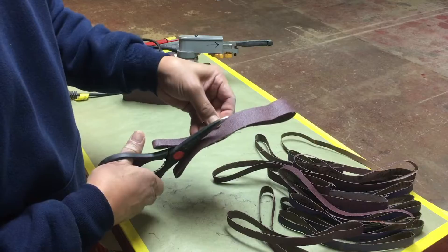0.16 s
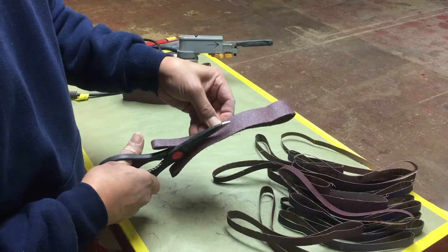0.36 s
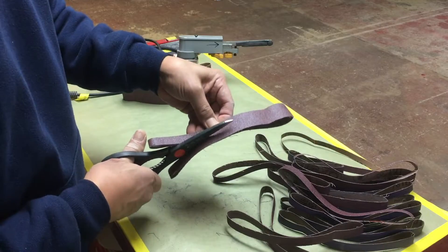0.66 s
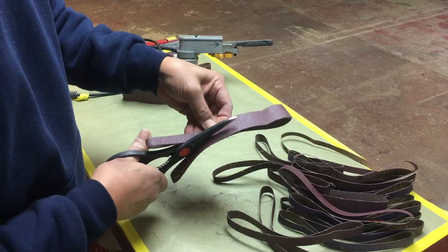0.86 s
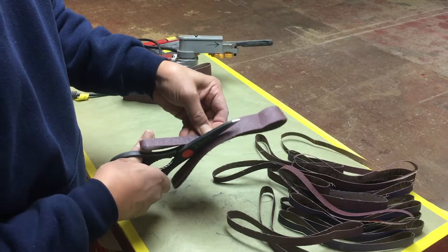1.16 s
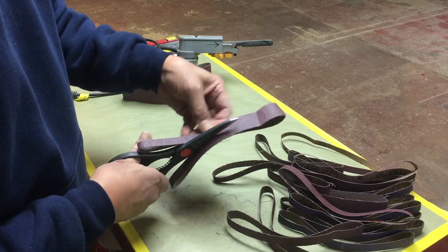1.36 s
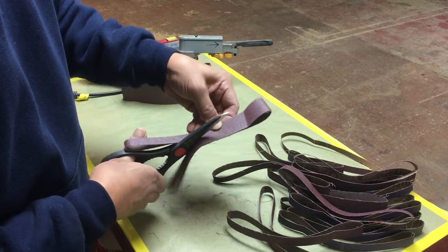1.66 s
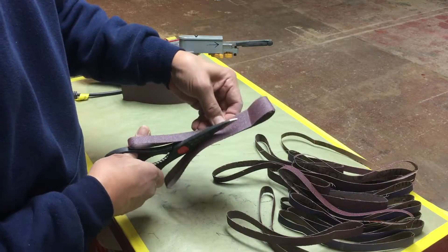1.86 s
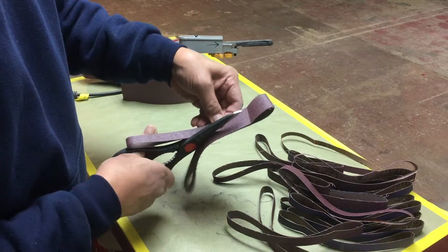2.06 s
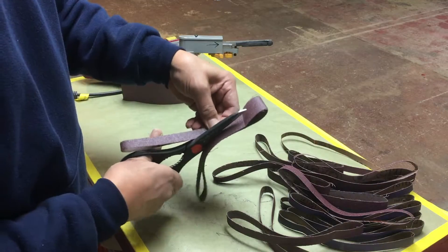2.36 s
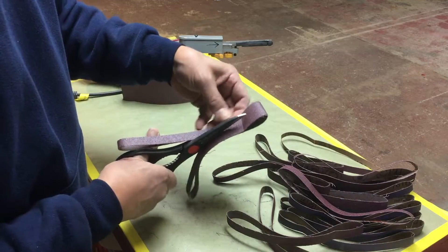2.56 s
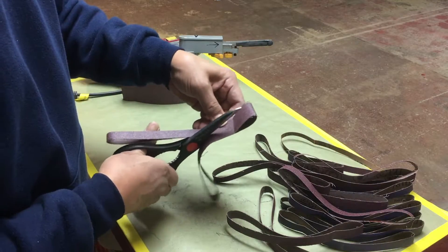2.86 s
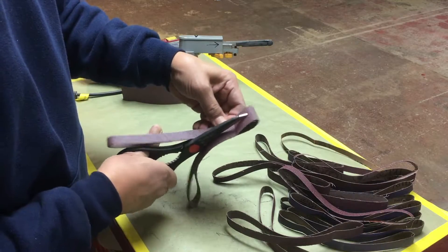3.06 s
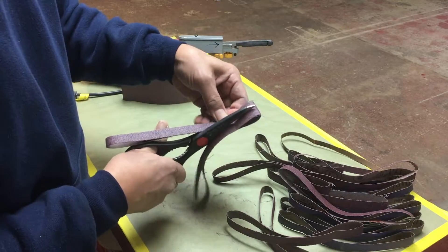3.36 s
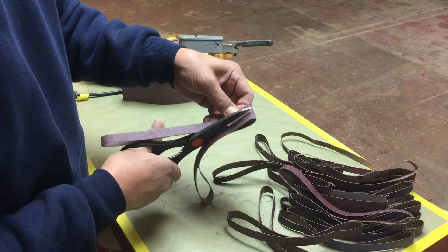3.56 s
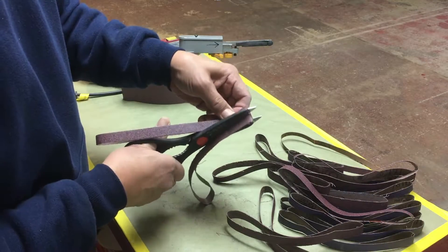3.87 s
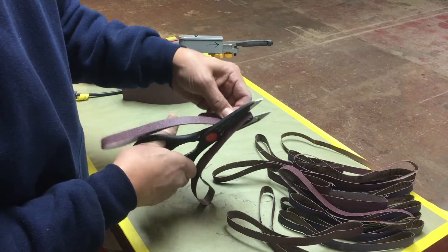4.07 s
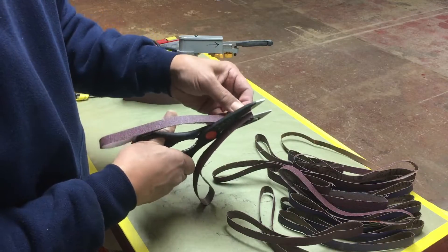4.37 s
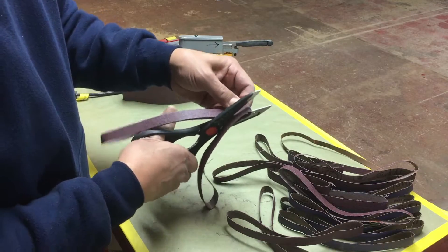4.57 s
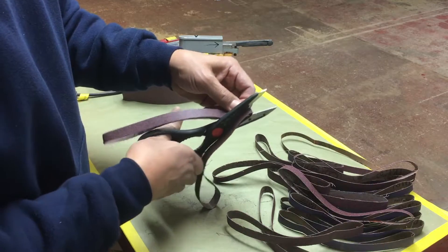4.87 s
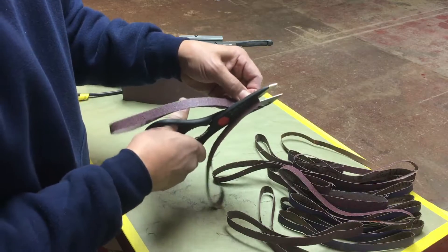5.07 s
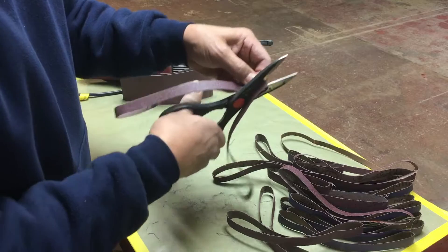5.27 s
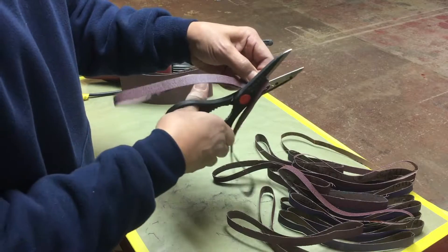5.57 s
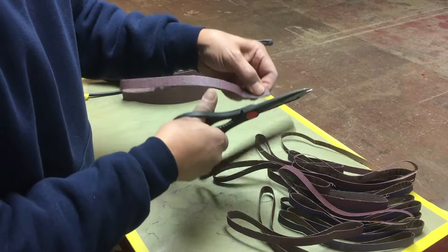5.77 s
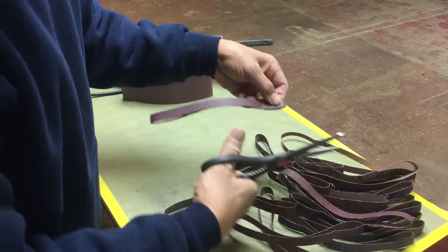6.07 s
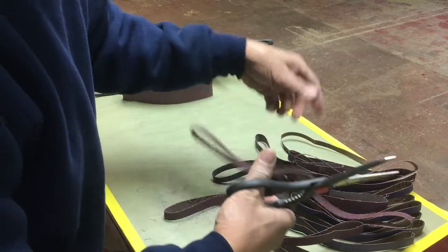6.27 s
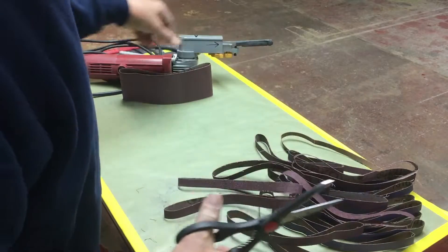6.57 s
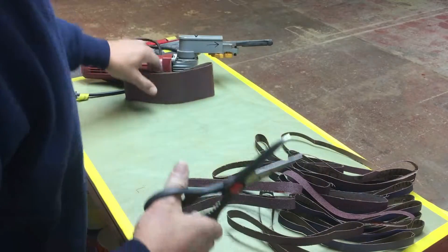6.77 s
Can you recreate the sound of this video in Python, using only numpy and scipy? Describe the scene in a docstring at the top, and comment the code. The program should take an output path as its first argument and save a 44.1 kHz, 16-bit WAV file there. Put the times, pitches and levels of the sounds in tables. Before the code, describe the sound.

A close mono pickup at a workbench in a large, lightly reverberant shop, with deep wandering ventilation rumble and faint steady hiss throughout. From 0 to 0.25 s thin gliding squeaks accompany the first scissor bites. Until about 6.0 s the blades crunch through coarse sanding belt in irregular quick snips: short gritty grinds packed with sharp, bright cracks, some metallic, with dull handle thuds. Brief lulls around 1.5, 2.6 and 5.6 s leave papery strip rustle and a fine trickle of grit. Dense crunches cluster near 1.7-2.5, 3.0-3.3 and 4.7-5.5 s, and a loud final crack comes at 5.98 s. After a short gap the freed strip drops at 6.37-6.44 s with a slap and slides dryly over the heap. At 6.78-6.81 s hard knocks make the bench resonate, with a low rough drag and another bright tick at 6.9 s.

```python
"""Scissors cutting a sanding belt

Scissors snip along a strip of coarse sanding belt above a workbench in a large shop. Each closing grinds in
dense noise grains and sharp cracks, coloured by grit, blades, strip and handles; the handles thud. The strip
rustles and sheds grit; at the end it drops and slides on a heap of belts, and the bench rings in damped modes
as it is knocked and dragged on. Ventilation rumbles under a steady hiss; thin gliding tones squeak at the start."""
import sys
import numpy as np
from scipy import signal
from scipy.fft import rfft, irfft, next_fast_len
from scipy.io import wavfile
from scipy.ndimage import uniform_filter1d

SR = 44100
rng = np.random.default_rng(int(sys.argv[2]) if len(sys.argv) > 2 else 0)


def wav_record(signal):
    """Record a signal, one row per channel, as 16-bit PCM in the file named by sys.argv[1]."""
    frames = np.transpose(np.atleast_2d(signal))
    bounded = np.clip(frames, -1, 1)
    # unit amplitude maps onto the largest positive 16-bit level
    quanta = np.round(bounded * 32767).astype(np.int16)
    wavfile.write(sys.argv[1], SR, quanta)


def makeup_ratio(level_db):
    """Linear amplitude ratio for a level in decibels (20 dB per factor of ten)."""
    decades = np.asarray(level_db, float) / 20
    return 10 ** decades


N = 305613


def rms_one(x):
    """Scale to rms 1."""
    return x / np.sqrt(np.mean(x ** 2) + 1e-20)


def in_time(rows):
    """Columns of a curve table, one value a sample."""
    s, *columns = np.transpose(rows)
    return [np.interp(np.arange(N) / SR, s, column) for column in columns]


def while_it_lasts(rows):
    """Gain of a level curve, silent outside its span."""
    t = np.arange(N) / SR
    inside = 1. * (t > rows[0][0]) * (t < rows[-1][0])
    return makeup_ratio(in_time(rows)[-1]) * uniform_filter1d(inside, 200)


def at_hz(points, hz):
    """Read a table on a log-frequency axis."""
    table_hz, values = np.transpose(points)
    return np.interp(np.log(hz + 1), np.log(table_hz), values)


def colour(x, spectrum):
    """Filter by a spectrum, scaled so that white noise keeps its rms."""
    size = next_fast_len(len(x))
    gain = makeup_ratio(at_hz(spectrum, np.fft.rfftfreq(size, 1 / SR)))
    return irfft(rfft(x, size) * rms_one(gain), size)[:len(x)]


def fade(x, t60_s):
    """Every click becomes an envelope that jumps up and dies away."""
    return signal.lfilter([1], [1, -makeup_ratio(-60 / (t60_s * SR))], x + 1e-18)


def grains(per_s, spread_db, t60_s):
    """Noise in short random bursts of uneven size; rms 1."""
    size = makeup_ratio(spread_db * np.minimum(rng.exponential(1, N), 4))
    born = (rng.random(N) < per_s / SR) * size
    return rms_one(fade(born, t60_s) * rng.standard_normal(N))


# Ventilation level. Each row: time in seconds, level in dB.
RUMBLE_CURVE = [(0, -27.5), (.46, -29), (.8, -33), (1.39, -31.5), (1.77, -27.5), (2.14, -35), (2.95, -30.5),
                (3.09, -34.5), (3.9, -34.5), (4.46, -29), (4.55, -35), (5.35, -33.5), (6.15, -40),
                (6.35, -30), (6.47, -30), (6.53, -36), (6.93, -25.5)]
# Ventilation spectrum. Each row: frequency in Hz, relative level in dB.
RUMBLE_SPECTRUM = [(19, -39), (32, 0.5), (59, 2.5), (87, 1.5), (110, -4.5), (246, -21), (400, -30),
                   (520, -49), (880, -120)]


def ventilation():
    """Low coloured noise whose level wanders."""
    return makeup_ratio(in_time(RUMBLE_CURVE)[0]) * colour(rng.standard_normal(N), RUMBLE_SPECTRUM)


# Hiss spectrum. Each row: frequency in Hz, relative level in dB.
HISS_SPECTRUM = [(180, -32), (300, -1), (570, -3), (2400, -8.5), (4900, -10), (6000, -3.5), (7700, -19),
                 (16000, -14)]


def steady_hiss():
    """Coloured noise at a constant level."""
    return makeup_ratio(-49) * colour(rng.standard_normal(N), HISS_SPECTRUM)


# Strip rustling in the fingers. Each row: time in seconds, level in dB.
RUSTLE_CURVE = [(0, -52), (.1, -51), (.3, -39.5), (.85, -64), (1.13, -43), (1.5, -49.5), (1.75, -59),
                (2.33, -53), (2.48, -76), (2.63, -45.5), (2.88, -77), (3.19, -43), (3.5, -43), (3.72, -57),
                (3.86, -48), (4.44, -44.5), (4.62, -64), (5.32, -48.5), (5.9, -83)]
# Rustle spectrum. Each row: frequency in Hz, relative level in dB.
RUSTLE_SPECTRUM = [(240, -27), (400, -10.5), (584, -5.5), (2610, -4.5), (4340, -4), (4880, -10), (5930, -2),
                   (7700, -9), (9000, -8), (11700, -30), (19800, -120)]


def rustle():
    """The handled strip crackles in dense, very uneven grains."""
    noise = grains(per_s=1900.0, spread_db=6.0, t60_s=0.013)
    return while_it_lasts(RUSTLE_CURVE) * colour(noise, RUSTLE_SPECTRUM)


# Loose grit coming off the strip. Each row: time in seconds, level in dB.
TRICKLE_CURVE = [(0, -46), (.37, -56), (1.25, -51), (1.45, -57), (1.89, -41), (2.35, -53), (2.6, -49),
                 (2.82, -53), (3.2, -47), (3.55, -43.5), (3.99, -43), (4.3, -42), (4.9, -43), (5.27, -50),
                 (6.05, -38.5), (6.14, -53), (6.36, -52), (6.38, -42), (6.5, -44), (6.65, -55), (6.82, -51),
                 (6.9, -39), (6.93, -36)]
# Grit spectrum, also heard in the cutting. Each row: frequency in Hz, relative level in dB.
GRIT_SPECTRUM = [(5000, -71), (7600, -10), (9400, 2), (10300, -5.5), (11200, 1), (12800, 2.5), (15400, 1),
                 (17000, -9)]


def trickle():
    """Loose grit trickles off in sparse, bright grains."""
    noise = grains(per_s=550.0, spread_db=5.5, t60_s=0.0091)
    return while_it_lasts(TRICKLE_CURVE) * colour(noise, GRIT_SPECTRUM)


# Faint squeaks, one list of rows each. Each row: time in seconds, pitch in Hz, level in dB.
SQUEAK_TONES = [
    [(.025, 3160, -54), (.045, 3560, -50), (.065, 3730, -51), (.085, 3720, -56)],
    [(.105, 3500, -55), (.12, 3510, -52), (.14, 3590, -53), (.15, 3600, -58)],
    [(.09, 1570, -57), (.13, 1550, -54), (.18, 1570, -58), (.23, 1540, -62)],
]


def squeaks():
    """Thin gliding tones that waver in strength."""
    tones = np.zeros(N)
    for rows in SQUEAK_TONES:
        pitch_hz = in_time(rows)[0]
        phase = 2 * np.pi * np.cumsum(pitch_hz) / SR
        tones += np.sqrt(2) * while_it_lasts(rows) * np.sin(phase)
    waver = 1 + 0.3 * rms_one(uniform_filter1d(rng.standard_normal(N), 350))
    return waver * tones


# Blade ring spectrum. Each row: frequency in Hz, relative level in dB.
BLADE_SPECTRUM = [(2000, -64), (3200, -16.5), (4400, -6), (4950, -7), (6000, 0.5), (6900, -2), (7600, -7),
                  (10000, -10)]
# Strip body spectrum. Each row: frequency in Hz, relative level in dB.
STRIP_SPECTRUM = [(800, -27), (1500, -3.5), (2100, -0.5), (2700, 0.5), (3600, -2), (4600, -10.5)]
# Handle spectrum. Each row: frequency in Hz, relative level in dB.
HANDLE_SPECTRUM = [(150, 3.5), (330, -4.5), (600, -2.5), (860, -4), (1200, -2), (1800, -23.5)]


def voices(push):
    """Grit, blades, strip and handles each colour their share of the excitation."""
    spectra = (GRIT_SPECTRUM, BLADE_SPECTRUM, STRIP_SPECTRUM, HANDLE_SPECTRUM)
    return sum(colour(share, spectrum) for share, spectrum in zip(push, spectra))


# Typed cracks, loud ones and isolated quiet ones; the rows from 6.369 s on are the strip dropping and
# hits on the bench. Each row: time in seconds, level in dB before trim, blade ring in dB re level,
# strip body in dB re level.
CRACK_ROWS = [(0.0572, -23, -17, -20), (.1562, -7, -20, -22), (.1725, -10, -9, -28), (.178, -12, -7, -20),
              (0.2005, -1, -1.5, -27), (0.213, 3, -26, -33), (.289, -17, -14, -15), (0.323, -18, -11, -10),
              (0.3457, -11.5, -3, -15), (.3597, -9, -1, -17), (0.3943, -11, -10, -19),
              (0.404, -3, -12, -17), (0.5393, -0.5, -3, -17.5), (0.6653, -1, -6, -25),
              (.682, -4, -4.5, -16), (0.6861, 1.5, -6, -33), (0.807, -2, -17, -50), (.8115, 5, -16, -39),
              (0.8953, -13, -16, -31), (.9182, -11, -1, -24), (0.937, -3, -4, -19), (0.952, 0, -7, -27),
              (0.9636, -2, -11, -22), (.982, -1, -3, -13.5), (0.9878, -4.5, -7, -33),
              (1.0149, -12, -4, -17), (1.0633, -17, -1, -21), (1.112, -14, 2, -16), (1.1564, -19, -14, -24),
              (1.2362, 6.5, -6, -18), (1.2408, -7, 1, -17), (1.258, -5, -4, -18), (1.287, -8, -7, -17),
              (1.4176, -16, -16, -19), (1.45, -8, -7, -27), (1.5129, -20.5, -7, -18),
              (1.7612, -18, -15, -9), (1.8063, -5.5, -17, -22), (1.852, -8, -5, -26),
              (1.8666, -5.5, -2, -20), (1.8757, -1.5, -8, -23), (1.8816, 0, -2, -23), (1.8907, -1, -1, -26),
              (1.909, -8, -4, -27), (1.9153, -1, -14, -18.5), (2.0315, -4, 3, -8.5), (2.0367, -7, -5, -20),
              (2.0519, -3, -14, -28), (2.079, -12, -17, -31), (2.144, -4, -3, -20), (2.148, -2.5, 1.5, -32),
              (2.164, -8, -8, -12), (2.188, -3, -1, -23), (2.1907, -4, -12, -36), (2.1939, -5.5, -3, -19),
              (2.217, -11.5, 1, -6.5), (2.2646, -3, -10, -25), (2.3043, -8, -27, -31),
              (2.4012, -4, -0.5, -29), (2.419, -10, -1, -25), (2.428, -10, -1, -20), (2.436, -5, -1, -31),
              (2.467, -9.5, -8, -16), (2.5038, 1, -4.5, -26), (2.769, -25, -13, -24), (2.8094, -4, -9, -34),
              (2.8274, -3.5, -8, -26), (2.851, -5, -8, -28), (2.9, -13, -12, -15), (2.944, -15, -12, -27),
              (2.9656, -16, -10, -21), (2.9827, -12, -1, -7.5), (2.994, -7, 4, -22), (3.008, -1, -5, -22),
              (3.015, -2, -1, -24), (3.026, -4, 0, -27), (3.037, -3, -1, -16), (3.0638, -2, -9, -26),
              (3.2645, -7, -8, -19), (3.283, 2, -14, -22), (3.2866, 3, -10, -30), (3.2906, 2, -12, -20),
              (3.298, -5, 2, -12), (3.3084, -11, -9, -9), (3.3497, 2.5, -9.5, -34), (3.4826, -18, -1, -13),
              (3.455, -22, -13, -14), (3.519, -11, -28, -25), (3.553, -19, -12, -25),
              (3.6442, -14, -4, -29), (3.6696, 0.5, -9, -35), (3.6965, -3.5, -0.5, -12.5),
              (3.7323, 1, -14, -26), (3.7883, -13, -15, -29), (3.8328, -11.5, 5.5, -26),
              (3.849, -4.5, -1, -31), (3.8541, -8, 3, -18), (3.8777, -5, 1, -26), (3.8963, -10, -4, -30),
              (3.959, -19, -6, -18), (4.0002, -16, 1, -15), (4.0413, -6.5, 5.5, -13.5),
              (4.119, -11, 1, -23), (4.1393, -8, -2, -22), (4.1503, -8, 3.5, -21), (4.1966, -3, -6, -24),
              (4.2008, -4, -9, -19), (4.2127, -5.5, -4, -24), (4.324, -14.5, -6, -21),
              (4.4448, -10, -16, -32), (4.4977, -18, -2, -20), (4.526, 2.5, -6.5, -28),
              (4.5311, -6, -4, -28), (4.596, -18.5, -12, -14), (4.6711, -13.5, -2, -24),
              (4.6852, -17, -3, -20), (4.701, -13, -10, -24), (4.7253, -8, -5, -29),
              (4.7476, -1.5, -3, -15), (4.7524, -3.5, 2.5, -21), (4.7777, -3.5, -3, -15),
              (4.7824, -12, 4, -19), (4.7992, -6.5, -9, -23), (4.8647, -8.5, 2, -15), (4.882, -15, -7, -12),
              (4.917, -0.5, 0, -24), (4.922, -6, .5, -19), (4.936, -14, 0, -19), (4.9685, -13, -12, -26),
              (5.016, 6, -9.5, -29), (5.0794, -13.5, 3.5, -21), (5.0916, -9.5, 0.5, -19),
              (5.2431, -5.5, -4.5, -29), (5.2555, -7, -1, -21), (5.3677, -16.5, 3, -13),
              (5.4134, -14, 4, -10), (5.4224, 0, -1, -29), (5.4333, -10, -9, -22), (5.4493, 0, -8, -20),
              (5.4561, 0.5, -3.5, -23), (5.4602, 1.5, -3, -35), (5.4679, 0.5, -11, -35),
              (5.4892, -9.5, -7, -35), (5.708, -6, -14, -34), (5.743, -11, -7, -23), (5.7616, -7, -4, -30),
              (5.7654, -1, -8, -32), (5.7692, -1, -19, -35), (5.7767, -5, -8, -30), (5.799, -14, -10, -27),
              (5.803, 1, -10, -24), (5.8155, 5, 1, -29), (5.824, -4, -2, -12.5), (5.919, -11.5, 2, -7),
              (5.9243, -11, 0, -7), (5.9474, -7.5, -5, -12.5), (5.9851, 11.5, -20, -40),
              (6.006, -2, -23, -46), (6.0266, -4, -30, -45), (6.066, -13, -10, -18),
              (6.1577, -27, -24, -20), (6.369, -6, 1, -8), (6.4409, 2, -0.5, -3.5), (6.7783, -33, -18, 8),
              (6.782, -14, -26, -16), (6.8097, -30, -13, -1), (6.8993, -17, -9, -11)]


def cracks(trim_db, snap):
    """A sharp snap and a burst of a few milliseconds; the strip rings a little longer than the grit."""
    s, db, blade_db, strip_db = np.transpose(np.vstack([small_cracks(), CRACK_ROWS]))
    fizz = np.sqrt(np.clip(1 - makeup_ratio(2 * blade_db), .05, 1))
    shares = [fizz, makeup_ratio(blade_db), makeup_ratio(strip_db), makeup_ratio(strip_db - 10.5)]
    clicks = np.zeros((4, N))
    clicks[:, (s * SR).astype(int)] = makeup_ratio(db + trim_db) * shares
    noise = rng.standard_normal(N)
    t60s_s = (.007, .011, .016, .03)
    return voices([snap * c + fade(c, t60_s) * noise for c, t60_s in zip(clicks, t60s_s)])


def smear(level, t60_s):
    """A level that holds its height and lets go of it at a steady rate of decay."""
    slope_db = 60 / t60_s * np.arange(N) / SR
    return makeup_ratio(np.maximum.accumulate(20 * np.log10(level + 1e-9) + slope_db, axis=1) - slope_db)


# Blades grinding through grit; the last row is a gritty scrape on the bench. Each row: start in seconds,
# length in seconds, level in dB, strip in dB re level, handles in dB re level.
SNIP_ROWS = [(0.163, 0.025, -32.5, -12, -24), (.194, 0.013, -21, -13, -17), (0.356, 0.032, -36, -5, -9),
             (.39, 0.012, -19.5, -12.5, -23), (0.524, 0.043, -28, -5.5, -14),
             (0.657, 0.014, -26.5, -19, -17), (.815, 0.019, -25, -16.5, -14.5),
             (.835, 0.026, -33, -9.5, -18), (0.929, 0.042, -31.5, -19, -21), (1.102, 0.037, -28, -5.5, -14),
             (1.14, .02, -33, -5, -17), (1.211, .016, -37, -3, -9), (1.233, .05, -29.5, -12, -23),
             (1.445, 0.016, -32, -15, -14), (1.704, 0.059, -21.5, -13, -19.5),
             (1.866, 0.025, -26, -26, -11), (1.909, 0.0089, -28, -12, -6), (2.024, 0.04, -24, -17, -18),
             (2.148, 0.018, -24, -23, -16), (2.18, 0.016, -28, -10, -23), (2.305, 0.054, -24.5, -17, -26),
             (2.427, 0.015, -30, -17, -12), (2.449, 0.034, -29.5, -16, -23), (2.503, 0.0079, -34, -23, -14),
             (2.821, 0.065, -25, -10.5, -21), (2.983, 0.018, -30, -13, -23), (3.007, 0.013, -19, -11, -18),
             (3.018, 0.051, -33, -8, -5.5), (3.164, 0.022, -21, -11, -28), (3.179, 0.018, -14.5, -19, -32),
             (3.24, 0.037, -36, -13, -19), (3.28, 0.056, -30, -10, -9), (3.343, 0.018, -31.5, -23, -7),
             (3.49, 0.034, -38.5, -5, -14), (3.689, 0.051, -22.5, -16.5, -27),
             (3.802, 0.025, -40, -19, -26), (3.852, 0.011, -17, -12, -31), (3.869, 0.013, -33, -1, -18),
             (4, 0.021, -35, -3, -13), (4.023, 0.04, -19.5, -13, -25), (4.147, 0.014, -21, -17, -24),
             (4.156, 0.031, -33, -16, -7.5), (4.196, 0.026, -40, -9, -17), (4.486, 0.035, -39.5, -14, -10),
             (4.647, 0.03, -38, -6.5, -3.5), (4.748, 0.0084, -18, -9.5, -30), (4.773, 0.01, -27, -5, -26),
             (4.695, .04, -42, -13, -24), (4.914, .023, -24, -15.5, -25), (4.941, 0.01, -28, -14, -20),
             (4.999, 0.042, -33.5, -19, -32), (5.072, .019, -32.5, -28, -12), (5.204, .022, -42, -16, -24),
             (5.236, .07, -28, -16, -26), (5.397, 0.038, -28.5, -20, -14), (5.448, 0.012, -33, -30, -12),
             (5.588, 0.051, -31, -11.5, -23), (5.684, 0.051, -40.5, -17, -21),
             (5.761, 0.009, -30.5, -26, -15), (5.807, 0.02, -22.5, -24, -38),
             (5.929, 0.043, -37.5, -9, -11), (5.981, 0.01, -29, -25, -31), (6.862, 0.049, -41.5, -17, 5.5)]
GRIND_BLADE_DB, GRIND_ROUGH = -2, 0.37   # blade ring re level; power share of lumps, 0-1
# faint grinding, re the snip: swells before it, dies after it
BITE_DB, BITE_T60_S, EASE_DB, EASE_T60_S = -16.5, .12, -16.5, 0.13


def snips(edge_s):
    """Grinding while the blades close; what the blades do not take of the level is grit fizz."""
    pressure = np.zeros((4, N))
    fizz = np.sqrt(1 - makeup_ratio(2 * GRIND_BLADE_DB))
    for s, length_s, db, strip_db, handle_db in SNIP_ROWS:
        shares = np.array([[fizz], [makeup_ratio(GRIND_BLADE_DB)], [makeup_ratio(strip_db)], [makeup_ratio(handle_db)]])
        pressure[:, int(s * SR):int((s + length_s) * SR)] = makeup_ratio(db) * shares
    bite = makeup_ratio(BITE_DB) * smear(pressure[:, ::-1], BITE_T60_S)[:, ::-1]
    ease = makeup_ratio(EASE_DB) * smear(pressure, EASE_T60_S)
    pressure = np.maximum(pressure, np.maximum(bite, ease))
    pressure = uniform_filter1d(pressure, int(edge_s * SR), axis=1)
    lumps = grains(per_s=380.0, spread_db=1.5, t60_s=0.0071)
    smooth = rng.standard_normal(N)
    return voices(pressure * (np.sqrt(1 - GRIND_ROUGH) * smooth + np.sqrt(GRIND_ROUGH) * lumps))


SMALL_PER_S, SMALL_DB, SMALL_SPREAD_DB = 130.0, 4.5, 3.5   # level re grinding, before trim
SMALL_BLADE_DB, SMALL_STRIP_DB, SMALL_VARY_DB = -7, -20.5, 3.5
LEAD_DB_PER_S, TRAIL_DB_PER_S = 450.0, 400.0


def small_cracks():
    """Rows like the typed cracks, at random moments, as strong as the grinding nearby; they lead and trail it."""
    chance = rng.random((3000, 2))
    vary = rng.standard_normal((3000, 2))
    s = np.cumsum(-np.log(1 - chance[:, 0])) / SMALL_PER_S
    start, length, db = np.transpose(SNIP_ROWS)[:3, :, None]
    lead_db = LEAD_DB_PER_S * np.maximum(start - s, 0)
    trail_db = TRAIL_DB_PER_S * np.maximum(s - start - length, 0)
    near_db = (db - lead_db - trail_db).max(axis=0)
    level_db = near_db + SMALL_DB - SMALL_SPREAD_DB * np.log(np.maximum(1 - chance[:, 1], .03))
    blade_db, strip_db = np.transpose([SMALL_BLADE_DB, SMALL_STRIP_DB] + SMALL_VARY_DB * vary)
    rows = np.transpose([s, level_db, np.minimum(blade_db, 1), np.minimum(strip_db, -13)])
    return rows[s < (N - 1) / SR]


def patchy(x, patch_db, per_s):
    """No two grains ring alike: 0.4-octave bands from 280 Hz up swell and sink on their own."""
    out, edges_hz = 0, 280 * 2 ** np.arange(0, 6.1, .4)
    spectrum, hz = rfft(x), np.fft.rfftfreq(N, 1 / SR)
    knots = np.arange(0, N / SR + 1, 1 / per_s) * SR
    for low, high in zip(edges_hz, edges_hz[1:]):
        sway = np.interp(np.arange(N), knots, rng.standard_normal(len(knots)))
        band = irfft(spectrum * (hz >= low) * (hz < high), N)
        out = out + makeup_ratio(patch_db * sway) * band
    return out


# Dull thuds of the handles loading up, and a few hard ticks. Each row: start in seconds, peak in dB, pitch in Hz.
THUD_ROWS = [(0.192, -29, 1260), (.538, -35, 1230), (1.235, -32, 1090), (1.713, -27, 1300),
             (1.865, -35, 1220), (2.144, -35.5, 720), (2.179, -34, 468), (2.87, -31.5, 745),
             (3.025, -24, 980), (3.067, -25.5, 1130), (3.165, -29, 1210), (3.265, -33, 1250),
             (3.299, -33, 530), (3.346, -29.5, 1200), (3.695, -39, 600), (3.833, -35.5, 510),
             (3.852, -33, 324), (3.874, -30, 497), (4.196, -35, 560), (4.655, -35.5, 307),
             (5.419, -37.5, 497), (5.945, -28, 1010), (6.777, -37, 3800), (6.809, -21, 3850),
             (6.9055, -19, 4070)]


def thuds(cycles, width):
    """A short puff of noise through one broad resonance, down 60 dB after so many cycles."""
    out, t = np.zeros(N + SR), np.arange(SR // 8) / SR
    for s, db, hz in THUD_ROWS:
        band = signal.butter(2, [hz / (1 + width), hz * (1 + width)], "band", fs=SR, output="sos")
        dying = makeup_ratio(-60 * t * hz / cycles)
        puff = signal.sosfilt(band, rng.standard_normal(len(t)) * dying)
        first = int(s * SR)
        out[first:first + len(t)] += makeup_ratio(db) * puff / np.abs(puff).max()
    return out[:N]


# Knocks on the bench top. Each row: time in seconds, relative strength in dB.
KNOCK_ROWS = [(5.947, -22), (6.44, -20), (6.777, -11), (6.809, -16.5), (6.839, -24), (6.898, -41)]
# Bench modes. Each row: frequency in Hz, relative level in dB, t60 in seconds.
BENCH_MODES = [(170, -20, 0.12), (213.5, -5.5, 0.81), (263, 2, 0.12), (355, -4, 0.1), (403, -7, 0.21),
               (586, -3, 0.045), (706, -12, 0.14), (777, -0.5, 0.11), (976, 0.5, .06), (1330, -3, 0.029),
               (1570, 1, 0.032), (2150, -12, 0.027)]


def bench(contact_hz):
    """Each knock is a soft click that strikes every mode with a strength of its own."""
    s, db = np.transpose(KNOCK_ROWS)
    chance_db = rng.normal(0, 1.8, (len(s), len(BENCH_MODES)))
    out = np.zeros(N)
    for k, (hz, level_db, t60_s) in enumerate(BENCH_MODES):
        clicks = np.zeros(N) + 1e-18
        clicks[(s * SR).astype(int)] = makeup_ratio(db + level_db - 12.5 + chance_db[:, k])
        r, w = makeup_ratio(-60 / (t60_s * SR)), 2 * np.pi * hz / SR
        out += signal.lfilter([0, np.sin(w)], [1, -2 * r * np.cos(w), r * r], clicks)
    return signal.sosfilt(signal.butter(1, contact_hz, fs=SR, output="sos"), out)


# Dropped strip sliding down the heap. Each row: time in seconds, level in dB.
SLIDE_CURVE = [(6.37, -30), (6.39, -39), (6.435, -46), (6.455, -41), (6.47, -27), (6.5, -31), (6.56, -36),
               (6.65, -36.5), (6.75, -41.5), (6.8, -43), (6.93, -44.5)]
# Slide spectrum. Each row: frequency in Hz, relative level in dB.
SLIDE_SPECTRUM = [(290, -40), (500, -14), (718, -6), (919, -17), (1190, -2.5), (1620, -13.5), (2610, 1.5),
                  (5970, -10), (14900, -31), (16000, -33)]


def slide():
    """The strip slides over the belts in grains too dense to tell apart."""
    noise = grains(per_s=8800.0, spread_db=-1.0, t60_s=0.0082)
    return while_it_lasts(SLIDE_CURVE) * colour(noise, SLIDE_SPECTRUM)


# Something dragged on the bench top after the big knock. Each row: time in seconds, level in dB.
DRAG_CURVE = [(6.776, -30), (6.78, -10), (6.794, -24), (6.89, -30), (6.904, -21), (6.93, -40)]
# Drag spectrum. Each row: frequency in Hz, relative level in dB.
DRAG_SPECTRUM = [(110, -11), (180, -4), (210, 1), (265, -3), (341, 2), (457, -13), (600, -3.5), (800, -8),
                 (930, -11), (1300, -13), (2300, -33), (3950, -15.5), (5000, -40)]


def drag():
    """Dragging sounds in sparse, very uneven grains, mostly low."""
    noise = grains(per_s=290.0, spread_db=6.5, t60_s=0.015)
    return while_it_lasts(DRAG_CURVE) * colour(noise, DRAG_SPECTRUM)


# Shop decay. Each row: frequency in Hz, t60 in seconds.
SHOP_DECAY = [(300, 1), (1300, 0.79), (3500, 0.94), (6000, 0.96), (9000, 1), (16000, 1)]
# Shop tail level. Each row: frequency in Hz, level in dB re direct.
SHOP_LEVEL = [(300, -9.5), (2000, -8.5), (6000, -13), (9000, -20.5), (16000, -35)]


def shop(x):
    """A diffuse tail: third-octave bands of noise, each dying at its own rate."""
    t, tail = np.arange(SR) / SR, 0
    edges_hz = 200 * 2 ** np.arange(0, 6.5, 1 / 3)
    white = rng.standard_normal((2, SR))   # neighbouring bands alternate
    for k, (low, high) in enumerate(zip(edges_hz, edges_hz[1:])):
        hz = np.sqrt(low * high)
        band = signal.sosfilt(signal.butter(2, [low, high], "band", fs=SR, output="sos"), white[k % 2])
        dying = makeup_ratio(-60 * t / at_hz(SHOP_DECAY, hz)) * np.minimum(t / 0.015, 1)
        tail = tail + band * dying * makeup_ratio(at_hz(SHOP_LEVEL, hz)) / np.sqrt(np.sum(dying ** 2))
    return signal.fftconvolve(x, tail)[:N]


def scene():
    """Work at the bench with its tail in the shop, over rumble and hiss."""
    cutting = cracks(trim_db=-7.5, snap=1.6) + snips(edge_s=0.0074)
    cutting = patchy(cutting, patch_db=3.0, per_s=45.0)
    work = squeaks() + cutting + thuds(cycles=31.0, width=0.26) + bench(contact_hz=3000.0)
    background = ventilation() + steady_hiss()
    close = rustle() + trickle() + slide() + drag()   # no tail
    return (background + close + work + shop(work))[None]


def low_pass(x):
    """Removes everything above the highest recorded frequency."""
    return signal.sosfilt(signal.butter(12, 16670, fs=SR, output="sos"), x)


def record(dry):
    """Peaks are rounded, the deep bass is cut, the top falls away in a step."""
    rounded = 1.002 * np.tanh(dry / 1.216)
    x = signal.sosfilt(signal.butter(4, 36.0, "high", fs=SR, output="sos"), rounded)
    step_filter = signal.ellip(10, .2, 30, 15950, fs=SR, output="sos")
    below = signal.sosfiltfilt(step_filter, x)
    mix = below + makeup_ratio(-44.0) * (x - below)
    return low_pass(mix)


dry = scene()
out = record(dry)
wav_record(out)
```